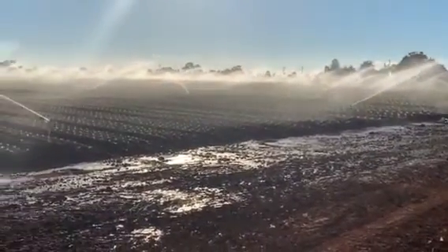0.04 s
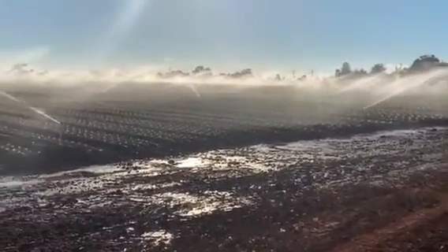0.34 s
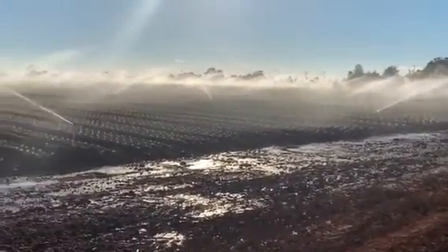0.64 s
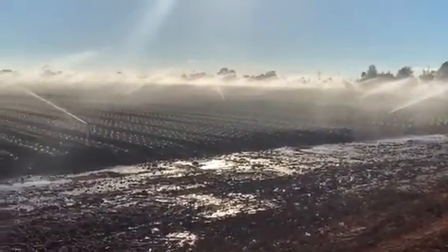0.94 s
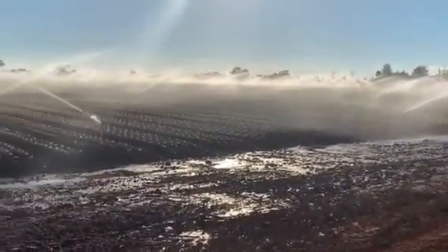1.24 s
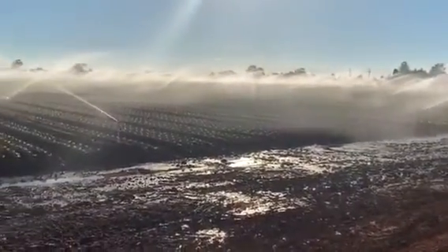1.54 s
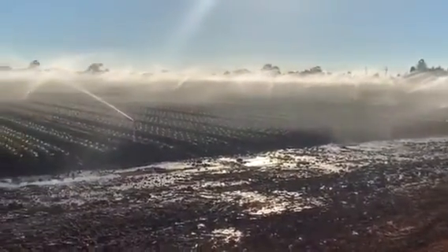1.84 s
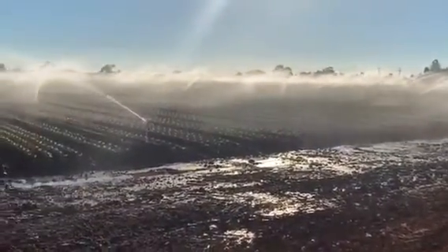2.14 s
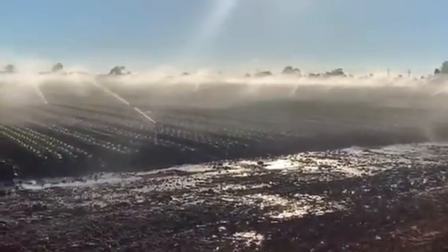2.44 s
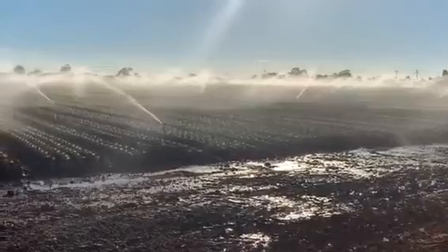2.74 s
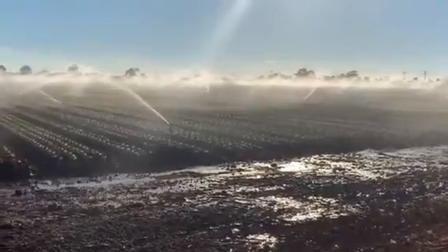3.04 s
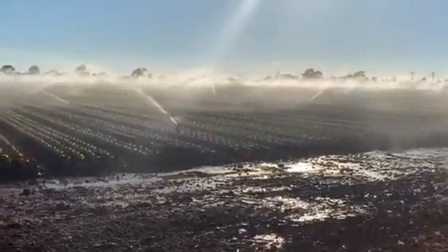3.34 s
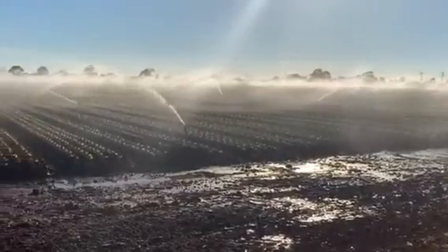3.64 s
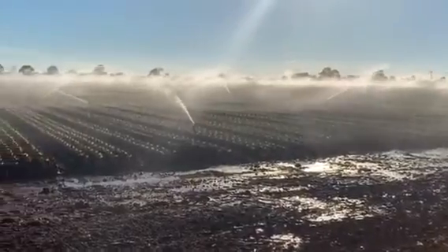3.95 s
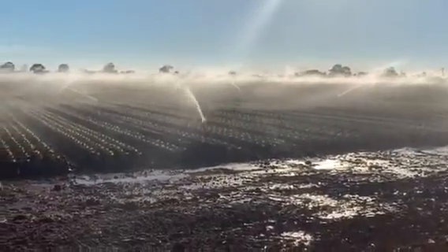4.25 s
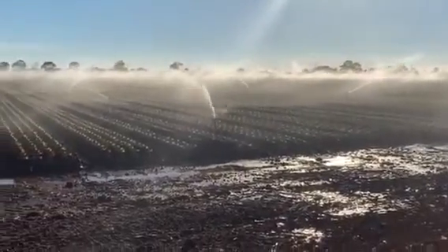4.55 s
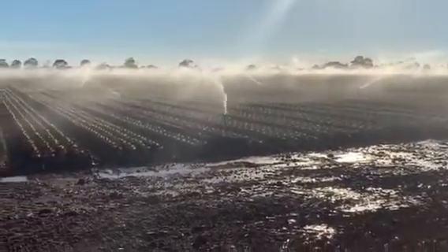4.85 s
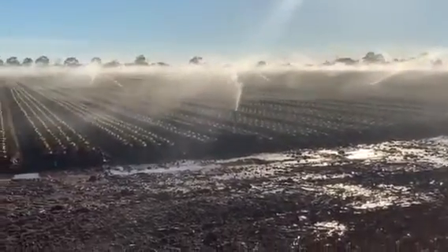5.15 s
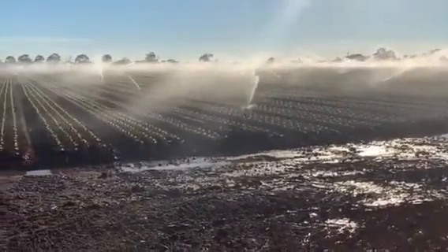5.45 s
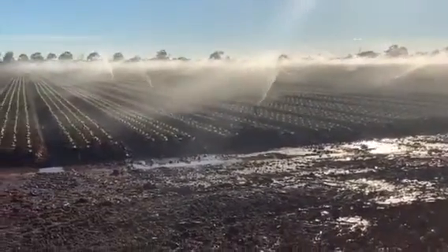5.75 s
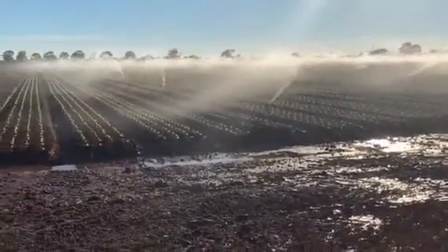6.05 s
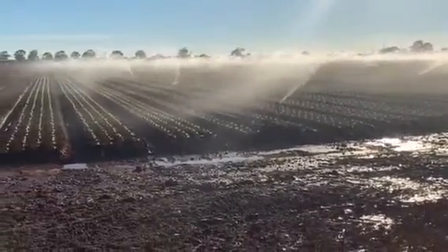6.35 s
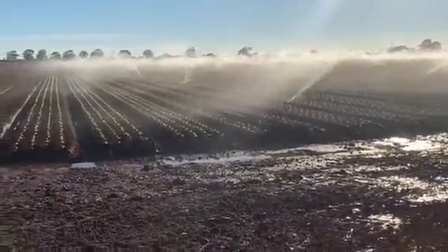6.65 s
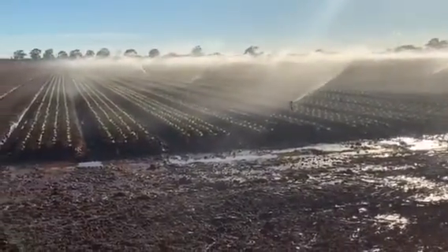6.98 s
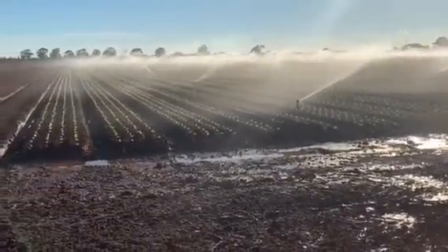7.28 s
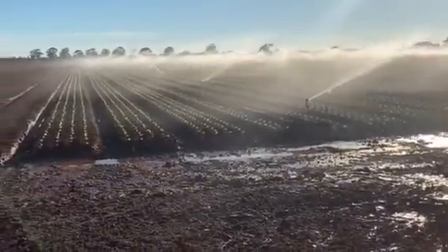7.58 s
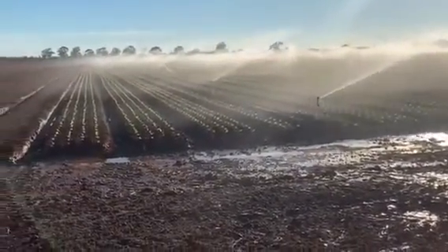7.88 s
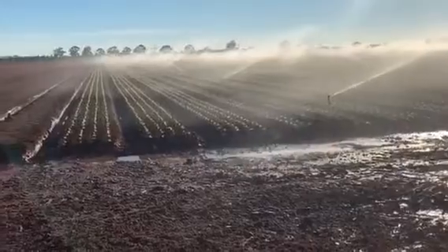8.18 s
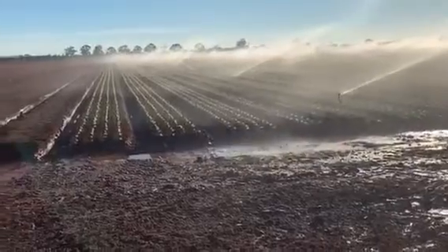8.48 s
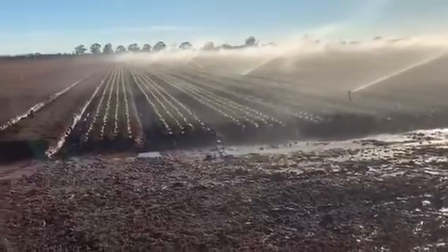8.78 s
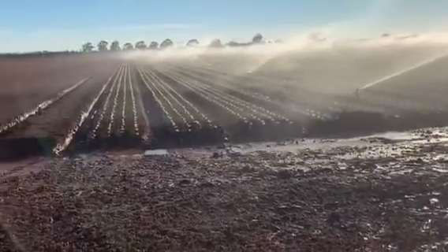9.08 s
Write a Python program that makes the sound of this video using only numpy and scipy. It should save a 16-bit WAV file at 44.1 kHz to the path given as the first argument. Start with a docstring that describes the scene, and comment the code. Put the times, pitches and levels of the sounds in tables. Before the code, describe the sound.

A nearby impact sprinkler spits in a fast, even, hissing rhythm while others tick at their own pace across an open field. Spray patters softly on soil and leaves. Just after a second in, all sound cuts out for almost a second, then resumes. Wind rumbles on the microphone and builds into stronger, thumping gusts in the last third, where a few stray drops plop on mud.

```python
"""Muddy edge of a crop field, watered by impact sprinklers.
The nearest spits 7.6 times a second as its arm swings through the jet; others tick at their own pace.
Spray lands on soil and leaves in a broad wash; stray drops plop on the mud.
A rising breeze buffets the microphone. The sound cuts out for almost a second near the start."""
import sys
import numpy as np
from scipy import signal
from scipy.fft import rfft, irfft, next_fast_len
from scipy.io import wavfile
from scipy.ndimage import uniform_filter1d

SR = 44100
rng = np.random.default_rng(int(sys.argv[2]) if len(sys.argv) > 2 else 0)


def to_wav(s):
    """Save 16-bit WAV."""
    ch = np.atleast_2d(s).T  # columns
    pcm = np.round(np.clip(ch, -1, 1) * 32767)  # PCM
    wavfile.write(sys.argv[1], SR, pcm.astype(np.int16))


N = 402191
TIME = np.arange(N) / SR

# spectrum of distant spits: f/Hz, level/dB
DISTANT_SPECTRUM = [(2000, -22), (4200, -6), (6000, -10.5), (7200, -3.5), (8300, 1), (10500, -1.5),
                    (12500, -2), (14000, -5)]


def amp(db):
    """dB to gain."""
    return 10 ** (np.asarray(db) / 20)


def unit(x):
    """Scale to rms 1."""
    return x / np.sqrt(np.mean(x ** 2) + 1e-20)


def follow(curve, t):
    """Columns of a control curve at times t."""
    times, *columns = np.transpose(curve)
    return [np.interp(t, times, column) for column in columns]


def colour(x, spectrum):
    """Shape x to a spectrum, rolled off below its first point; rms 1."""
    size = next_fast_len(N, True)
    hz = np.fft.rfftfreq(size, 1 / SR)
    points_hz, points_db = np.transpose(spectrum)
    gain = amp(np.interp(np.log(hz + 1), np.log(points_hz), points_db))
    low_cut = np.minimum(hz / points_hz[0], 1) ** 2
    return unit(irfft(rfft(x, size) * gain * low_cut, size)[:N])


def noise(spectrum):
    """Coloured noise, rms 1."""
    return colour(rng.standard_normal(N), spectrum)


def wander(rate_hz):
    """Smooth random drift up to about rate_hz; rms 1."""
    size = next_fast_len(N, True)
    hz = np.fft.rfftfreq(size, 1 / SR)
    low_pass = np.exp(-(hz / rate_hz) ** 2)
    return unit(irfft(rfft(rng.standard_normal(N), size) * low_pass, size)[:N])


def steady(x, span_s):
    """Level out swells slower than span_s."""
    return x / np.sqrt(np.abs(uniform_filter1d(x ** 2, int(span_s * SR) + 1)) + 1e-9)


def airflow():
    """Breeze plus passing gusts: rows of t/s, rumble/dB, eddies/dB."""
    # breeze between gusts: t/s, rumble/dB, eddies/dB
    breeze = [(0, -38, -52), (1.28, -42, -50.5), (2.35, -37.5, -48), (2.65, -47, -56.5), (3.2, -40, -47),
              (4, -42.5, -51.5), (5.25, -38.5, -50), (5.8, -35.5, -40), (6.4, -37.5, -43.5),
              (7.85, -35.5, -40), (8.4, -35, -40.5), (9.12, -29, -28)]
    # gusts: crest t/s, length/s, rumble/dB, eddies/dB
    gusts = [(0.116, 0.044, -32, -40), (0.44, 0.042, -30.5, -52), (0.696, 0.096, -32.5, -49),
             (1.044, .06, -36, -53), (1.237, .08, -36, -47), (2.278, 0.17, -32.5, -40.5),
             (2.904, 0.21, -32.5, -44), (3.082, 0.049, -25.5, -32.5), (4.604, 0.04, -33, -48),
             (5.408, .12, -38, -38), (5.845, 0.038, -31, -34.5), (6.173, 0.2, -31.5, -36),
             (6.422, 0.036, -30, -48), (6.565, 0.073, -42, -36), (6.793, 0.11, -32.5, -32),
             (7.157, 0.1, -35.5, -39), (7.504, 0.21, -37, -36), (7.991, 0.14, -39, -30.5),
             (8.228, 0.19, -26, -26), (8.463, 0.082, -30.5, -31), (8.63, .14, -28, -29),
             (8.925, 0.087, -30, -30)]
    t = TIME[::100]
    power = amp(follow(breeze, t)) ** 2
    for crest_s, length_s, rumble_db, eddy_db in gusts:
        swell = np.exp(-np.abs(2 * (t - crest_s) / length_s) ** 3)  # squarer than a bell
        power += amp([[rumble_db], [eddy_db]]) ** 2 * swell
    return np.column_stack([t, *10 * np.log10(power)])


def wind():
    """Large eddies rumble; harder gusts shed smaller ones that reach higher in pitch."""
    # slow pressure swings: f/Hz, level/dB
    rumble_spectrum = [(12, -18.5), (25, -7), (38, 1), (60, 3), (90, -1), (120, -7), (160, -23),
                       (400, -67.5)]
    air = airflow()
    rumble_db, eddy_db = follow(air, TIME)
    hz, t, bins = signal.stft(rng.standard_normal(N), SR, nperseg=2048)
    hz = hz[:, None]
    excess_db = np.maximum(follow(air, t)[1] + 36, 0)
    corner_hz = 145 * amp(0.34 * excess_db)
    low_cut = (hz / 100) ** 4 / (1 + (hz / 100) ** 4)
    band = low_cut / np.sqrt(1 + (hz / corner_hz) ** 5.6)
    eddies = signal.istft(bins * band, SR, nperseg=2048)[1][:N] * amp(5.1 * wander(rate_hz=37))
    rumble = steady(noise(rumble_spectrum), span_s=.07) * amp(2.7 * wander(rate_hz=28))
    return amp(rumble_db) * rumble + amp(eddy_db) * steady(eddies, span_s=.08)


def thumps():
    """Single eddies hit the microphone, each a pressure swing of about one cycle."""
    # eddies: t/s, level/dB, centre f/Hz
    eddies = [(.252, -25.5, 272), (0.469, -29.5, 193), (2.214, -23.5, 150), (3.087, -31, 300),
              (3.549, -33, 297), (5.894, -15.5, 173), (6.08, -20.5, 113), (6.783, -21.5, 183),
              (6.833, -20.5, 192), (7.293, -20, 62.4), (7.444, -14, 160), (7.535, -17, 128),
              (7.722, -18, 145), (7.92, -15.5, 287), (8.212, -10.5, 146), (8.661, -16.5, 125),
              (8.944, -15.5, 460)]
    out = np.zeros(N)
    for (at_s, db, hz), phase in zip(eddies, rng.random(len(eddies))):
        cycles = (TIME - at_s) * hz
        near = np.abs(cycles) < 4
        out[near] += amp(db) * np.exp(-cycles[near] ** 2) * np.cos(2 * np.pi * (cycles[near] + phase))
    return amp(-2.5) * out


def overload(pressure, ceiling_db):
    """The microphone rounds off the hardest buffets."""
    return amp(ceiling_db) * np.tanh(pressure / amp(ceiling_db))


def hoot():
    """A gust across the microphone port: a brief, unsteady, sinking tone."""
    # tone: t/s, f/Hz, level/dB
    glide = [(8.195, 680, -60), (8.208, 634, -40), (8.228, 573, -32), (8.25, 510, -46), (8.30, 485, -45),
             (8.32, 480, -64)]
    hz, db = follow(glide, TIME)
    cycles = np.cumsum(hz * (1 + 0.039 * wander(rate_hz=120))) / SR
    sounding = (TIME > glide[0][0]) & (TIME < glide[-1][0])
    return sounding * amp(db) * np.sin(2 * np.pi * cycles)


def drops(per_s, spread_db):
    """Random impacts, most small, a few large; rms 1."""
    size = amp(spread_db * np.minimum(rng.exponential(1, N), 4))
    return unit(rng.standard_normal(N) * size * (rng.random(N) < per_s / SR))


def falling_spray():
    """Drops patter on soil and leaves, brighter as a jet sweeps closer."""
    # landing spray: f/Hz, level/dB
    wash_spectrum = [(130, -15), (220, -5), (330, -2.5), (450, -8), (580, -7), (720, -3), (880, 1.44),
                     (1080, -0.5), (1250, -3.5), (1520, -0.05), (1950, -7), (2250, -8.5), (3000, -16),
                     (6000, -40.5)]
    # sweep of the jets: t/s, level/dB, brightness/dB
    sweep = [(0, -50, 0), (.55, -46, -0.9), (.74, -46.5, .2), (.92, -46, 1.8), (1.28, -45.5, -1.1),
             (2.22, -48.5, 0.5), (2.62, -48, 0.9), (2.9, -47.5, 2.8), (3.3, -50, -.7), (3.85, -48.5, -1.1),
             (5.25, -48.5, -5), (5.62, -50.5, -3.7), (5.92, -47.5, -3.5), (6.25, -49.5, -3),
             (7.15, -49, -1.5), (7.9, -48.5, -1.1), (9.1, -48.5, -1.5)]
    patter = colour(drops(per_s=12000, spread_db=2.0), wash_spectrum)
    hz, t, bins = signal.stft(patter, SR, nperseg=512)
    level_db, bright_db = follow(sweep, t)
    treble = np.clip((hz - 1100) / 350, 0, 1)[:, None]
    patches = uniform_filter1d(rng.standard_normal(bins.shape), size=2, axis=0)
    patches = unit(uniform_filter1d(patches, size=14, axis=1))
    bins *= amp(level_db + treble * bright_db + 1.42 * patches)
    return amp(3.5) * signal.istft(bins, SR, nperseg=512)[1][:N]


def plops():
    """Stray drops knock the nearby mud, each at its own pitch."""
    # landings: t/s, level/dB
    landings = [(5.865, -40), (5.988, -39.5), (6.203, -41), (6.745, -38), (7.58, -38), (7.619, -37.5),
                (7.863, -36.5), (7.907, -37), (7.952, -38), (7.983, -34.5), (8.021, -35.5), (8.09, -40),
                (8.611, -37), (8.762, -39), (8.811, -39.5), (8.845, -39), (8.869, -36)]
    # dull ring of the mud: nominal f/Hz, level/dB, t60/s
    mud_modes = [(570, -1, 0.023), (873, 8, 0.011), (1390, -3, 0.0093)]
    out, t = np.zeros(N), np.arange(SR // 25) / SR
    attack = 1 - np.exp(-t / 0.0011)
    for (at_s, db), pitch in zip(landings, rng.uniform(0.89, 1.296, len(landings))):
        ring = sum(amp(mode_db - 60 * t / t60_s) * np.sin(2 * np.pi * hz * pitch * t)
                   for hz, mode_db, t60_s in mud_modes)
        part = out[int(at_s * SR):][:len(t)]
        part += amp(db) * (ring * attack)[:len(part)]
    return amp(7.0) * out


def swings(period_s, marks, spread_db, jitter_s=.0004):
    """A sprung arm beats evenly between marks, each swing a little off: rows of t/s, level/dB."""
    mark_s, mark_db = np.transpose(marks)
    mark_beats = np.concatenate([[0], np.cumsum(np.round(np.diff(mark_s) / period_s))])
    beats = np.arange(mark_beats[-1] + 1)
    late, strong = rng.standard_normal((len(beats), 2)).T
    times = np.interp(beats, mark_beats, mark_s) + jitter_s * late
    levels_db = np.interp(beats, mark_beats, mark_db) + spread_db * strong
    return list(zip(times, levels_db))


def spit(dwell_s, scatter_db, scatter_s, rise_s=.0005):
    """Power of one spit: full while the arm is in the jet, then scattered water dies away."""
    t = np.arange(SR // 10) / SR
    in_jet = 1 / (1 + (t / dwell_s) ** 8)
    scatter = amp(scatter_db) ** 2 * (1 - in_jet) * np.exp(-t / scatter_s)
    return (1 - np.exp(-t / rise_s)) * (in_jet + scatter)


def envelope(spits, power_shape):
    """Amplitude of one power shape fired at each row of t/s, level/dB."""
    times, db = np.transpose(spits)
    onsets = np.clip(times * SR, 0, N - 1).astype(int)
    train = np.bincount(onsets, amp(db) ** 2, N)
    return np.sqrt(np.abs(signal.oaconvolve(train, power_shape)[:N]))


def far_sprinklers(count=6):
    """Far heads, each on its own beat, merge into a flutter over hissing mist."""
    # nozzle and mist hiss: f/Hz, level/dB
    mist_spectrum = [(2000, 3.5), (3500, 1.5), (4500, 2), (6000, 0.5), (8200, 0), (10500, -1), (12500, -3),
                     (14000, -9.5)]
    spits = []
    for period_s, phase in zip(rng.uniform(.095, .15, count), rng.random(count)):
        times = np.arange(phase * period_s, N / SR, period_s)
        spits += zip(times, rng.normal(-55, 3.7, len(times)))
    shape = spit(dwell_s=0.0061, scatter_db=-10, scatter_s=0.0093, rise_s=0.0034)
    flutter = noise(DISTANT_SPECTRUM) * envelope(spits, shape)
    mist = colour(drops(per_s=14000, spread_db=2.5), mist_spectrum)
    return flutter + amp(-58.0) * mist * amp(1.4 * wander(rate_hz=31))


def neighbour_sprinklers():
    """Four surrounding heads spit, thin and broken with distance."""
    # per head: swing period/s, spit marks (t/s, level/dB)
    heads = [ (.0955, [(.01, -50.5), (.678, -47.5), (1.249, -50.5), (2.266, -55.5), (3.586, -51),
             (4.908, -52), (6.439, -53.5), (8.073, -48.5), (9.026, -53)]), (.1265, [(.084, -58),
             (1.229, -57), (2.281, -58.5), (2.918, -52), (4.307, -63), (6.705, -57), (7.837, -52.5),
             (9.091, -56)]), (.128, [(.049, -56), (1.208, -53.5), (2.218, -54.5), (4.004, -56),
             (5.281, -54.5), (6.68, -56), (7.434, -50.5), (9.06, -65)]), (.135, [(.131, -49.5),
             (1.229, -52.5), (2.295, -53.5), (3.908, -52), (4.452, -57), (6.725, -61.5), (8.06, -51.5),
             (8.995, -63)]), ]
    spits = [row for head in heads for row in swings(*head, spread_db=1.7)]
    shape = spit(dwell_s=0.008, scatter_db=-2.5, scatter_s=.007)
    water = noise(DISTANT_SPECTRUM) * envelope(spits, shape)
    return amp(1.5) * water * amp(3.3 * wander(rate_hz=650))


def ground_bounce(x, lag_s, gain):
    """Reflection off wet ground; the lag drifts as the microphone moves."""
    drifting_lag_s = lag_s * (1 + .04 * wander(rate_hz=0.69))
    return x + gain * np.interp(TIME - drifting_lag_s, TIME, x)


def turn_away(spits):
    """Spits lose body as the heads turn away; the sizzle stays."""
    # body of the spits: t/s, level/dB
    facing = [(0, 3.5), (1.3, 3), (3.4, 0.5), (5.0, 1), (7.0, -2), (9.1, -2.5)]
    hz, t, bins = signal.stft(spits, SR, nperseg=128)
    body = np.clip((7800 - hz) / 2000, 0, 1)[:, None]
    bins *= amp(body * follow(facing, t)[0])
    return signal.istft(bins, SR, nperseg=128)[1][:N]


def near_sprinkler():
    """The arm grazes the jet, cuts in with a snap, and water tears over it in ragged lumps."""
    # turning head: swing period/s, spit marks (t/s, level/dB)
    head = (.1315, [(.11, -45.5), (1.288, -45.5), (2.3134, -44.5), (2.837, -43.5), (3.4935, -43),
            (3.8905, -41), (5.08, -47), (6.403, -46.5), (7.8547, -44.5), (9.036, -41.5)])
    # first cut into the jet: f/Hz, level/dB
    snap_spectrum = [(1500, -17), (3000, -4), (4100, -3.5), (5000, -11.5), (6500, -9.5), (8500, 3.5),
                     (14000, -5)]
    # water slapping the arm's spoon: f/Hz, level/dB
    slap_spectrum = [(2500, -29.5), (4200, -23), (5200, -15), (6200, -10.5), (7200, -5), (8400, -5.5),
                     (10000, -1), (12300, 0), (14000, -2.5)]
    t = np.arange(SR // 20) / SR
    spits = swings(*head, spread_db=1.6)
    lead_s = .012
    graze_shape = (t < lead_s) * np.exp((t - lead_s) / 0.0049)
    graze = envelope([(at_s - lead_s, db) for at_s, db in spits], graze_shape)
    slap = envelope(spits, spit(dwell_s=0.0082, scatter_db=-11.0, scatter_s=.011))
    snap = amp(1.5) * noise(snap_spectrum) * envelope(spits, np.exp(-t / 0.0029))
    water = amp(0.1) * noise(slap_spectrum) * np.hypot(slap, amp(-14.0) * graze)
    ragged = amp(1.4 * wander(rate_hz=490))
    return ground_bounce((snap + water) * ragged, lag_s=.00073, gain=.4)


def scene():
    """Sprinklers, falling water and wind; mono."""
    spits = turn_away(near_sprinkler() + neighbour_sprinklers())
    water = spits + far_sprinklers() + falling_spray() + plops()
    buffets = overload(wind() + thumps(), ceiling_db=-15.0)
    return (water + buffets + hoot())[None]


def record(dry):
    """One dropout, then a low-pass."""
    # dropout: start t/s, end t/s
    dropout_s = (1.2935, 2.2063)
    live = (TIME < dropout_s[0]) | (TIME > dropout_s[1])
    cutoff_hz = 14350
    low_pass = signal.firwin(511, cutoff_hz, window=("kaiser", 9), fs=SR)
    return signal.oaconvolve(dry * live, low_pass[None], "same")


dry = scene()
out = record(dry)
to_wav(out)
```